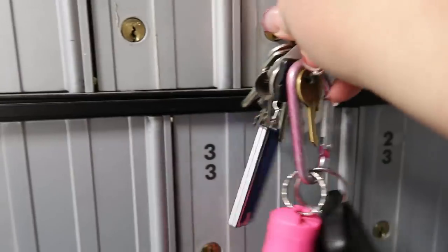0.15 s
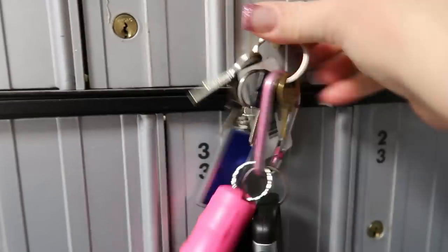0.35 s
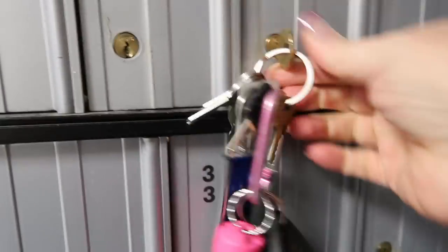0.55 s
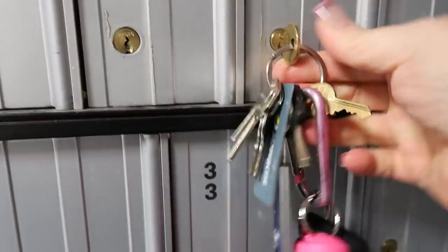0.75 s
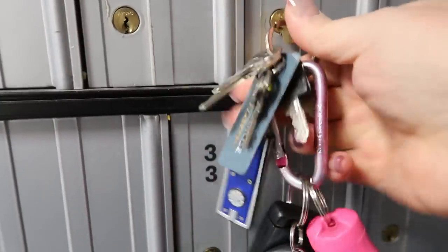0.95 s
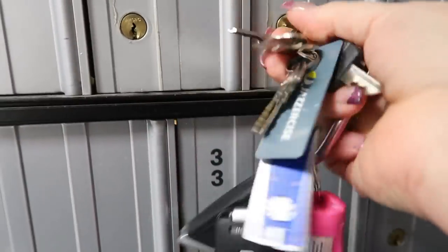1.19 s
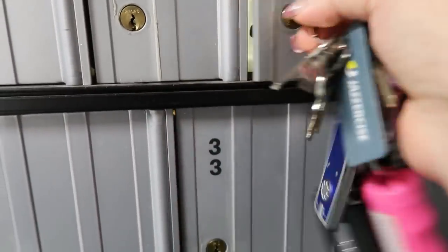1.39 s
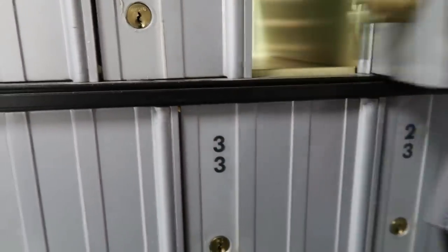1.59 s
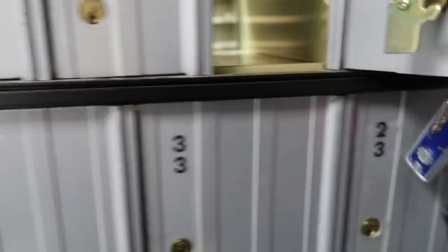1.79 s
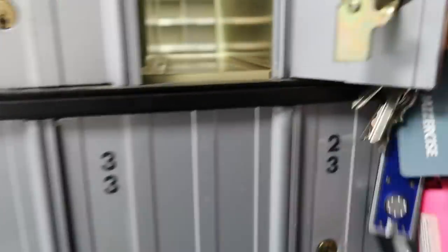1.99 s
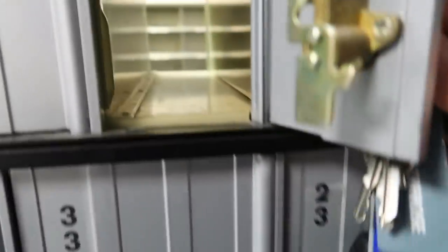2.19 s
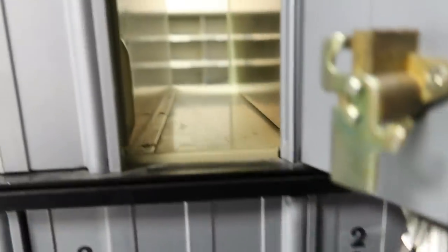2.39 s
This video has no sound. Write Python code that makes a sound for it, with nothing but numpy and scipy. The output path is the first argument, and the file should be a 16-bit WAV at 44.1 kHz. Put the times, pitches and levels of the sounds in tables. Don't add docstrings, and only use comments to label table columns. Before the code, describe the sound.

A bunch of keys jangles as one clacks into a metal box lock and turns; the small sheet-metal door swings open and hits its stop with a sharp clank, very close, in a hard indoor lobby.

```python
import sys
import numpy as np
from scipy import signal
from scipy.fft import rfft, irfft, next_fast_len
from scipy.io import wavfile
from scipy.ndimage import uniform_filter1d, map_coordinates

SR = 44100
rng = np.random.default_rng(int(sys.argv[2]) if len(sys.argv) > 2 else 0)


def attenuation_scalar(level_db):
    decades = np.asarray(level_db, float) / 20
    return 10 ** decades


def log_audio(samples):
    frames = np.atleast_2d(samples).T
    limited = np.clip(frames, -1, 1)
    pcm = np.round(limited * 32767).astype(np.int16)
    wavfile.write(sys.argv[1], SR, pcm)


N = 108045


def unit(x):
    return x / np.sqrt(np.mean(x ** 2) + 1e-20)


def along(points, hz):
    f, v = np.transpose(points)
    return np.interp(np.log(hz + 1), np.log(f + 1), v)


def curves(rows):
    s, *cols = np.transpose(rows)
    return [np.interp(np.arange(N) / SR, s, c) for c in cols]


def filtered(x, response):
    m = next_fast_len(x.shape[-1] + 8192)
    spectrum = rfft(x, m) * response(np.fft.rfftfreq(m, 1 / SR))
    return irfft(spectrum, m)[..., :x.shape[-1]]


def band(x, lo_hz, hi_hz):
    sos = signal.butter(3, [lo_hz, min(hi_hz, SR / 2.2)], "band", fs=SR, output="sos")
    return signal.sosfilt(sos, x)


def add(track, s, sound):
    part = track[round(s * SR):][:len(sound)]
    part += sound[:len(part)]


def ring(hz, db, t60, attack):
    t = np.arange(round(SR * np.max(t60)) + 1)[:, None] / SR
    decay = attenuation_scalar(db - 60 * t / t60)
    modes = decay * np.sin(2 * np.pi * hz * t) * (1 - np.exp(-t / attack))
    return modes.sum(axis=1)


def cluster(count):
    even = np.linspace(-1, 1, count)
    return even + rng.uniform(-1.03, 1, count) / count * (even != 0)


# [f/Hz, correlation]
DIFFUSE_LIKENESS = [(300, 0.99), (1400, 0.95), (3100, 0.78), (7000, 0.21)]


def spread(pair):
    def mid_side_gain(hz):
        turn = np.arccos(np.clip(along(DIFFUSE_LIKENESS, hz), -1, 1)) / 2
        return np.array([np.cos(turn), np.sin(turn)])

    mid, side = filtered(pair, mid_side_gain)
    return np.array([mid + side, mid - side])


# [f/Hz, level/dB]
HUM_COLOUR = [(25, -20), (300, 8.5), (1000, -11.5), (3000, -26), (8000, -26), (13000, -55)]
# [t/s, level/dB]
GRIP_RUMBLE = [(0, -56.5), (.3, -39), (.75, -42.5), (1.2, -56.5), (2.45, -66)]


def air():
    hum = unit(spread(filtered(rng.standard_normal((2, N)), lambda hz: attenuation_scalar(along(HUM_COLOUR, hz)))))
    near_box = np.clip(np.arange(N) / SR * 2 - 3.6, 0, 1)
    hum_db = -46.5 - 14 * near_box
    grip_db, = curves(GRIP_RUMBLE)
    thumps = unit(band(rng.standard_normal(N), 8.8, 200))
    return attenuation_scalar(hum_db) * hum + attenuation_scalar(grip_db) * thumps


def clinks(lo_hz, hi_hz, count):
    hits_per_s, t60, scatter_db, level_db = 45, 0.022, 4, -2.5
    hz = np.exp(rng.uniform(np.log(lo_hz), np.log(hi_hz), count))
    r = attenuation_scalar(-60 / t60 / SR)
    hits = rng.random((count, N)) < hits_per_s / SR
    hits = hits * attenuation_scalar(scatter_db * rng.standard_normal((count, N)))
    total = np.zeros(N)
    for w, h in zip(2 * np.pi * hz / SR, hits):
        total += np.sin(w) * signal.lfilter([1], [1, -2 * r * np.cos(w), r * r], h)
    return attenuation_scalar(level_db) * unit(total)


# [t/s, body level/dB, treble level/dB]
HAND_MOTION = [(0, -48.5, -74), (.174, -59, -87), (.178, -51, -41), (.335, -54.5, -70.5),
               (.345, -37.5, -81), (.46, -26, -34), (.56, -32, -43), (.68, -37.5, -90), (.8, -34.5, -33.5),
               (.91, -54.5, -69), (.96, -34, -46.5), (1.17, -48, -54), (1.32, -36, -55),
               (1.64, -53.5, -67.5), (1.76, -38.5, -42), (1.88, -42.5, -43), (1.95, -50, -75),
               (2.1, -63, -100)]
# [f/Hz, level/dB]
STEEL_COLOUR = [(250, -2.5), (700, 2.5), (2600, -4), (6000, -10.5), (9000, -22.5)]


def rattle():
    grains_per_s, scatter_db, grain_t60 = 1300, 8, 0.0053
    body_db, treble_db = curves(HAND_MOTION)
    hits = rng.random((2, N)) < grains_per_s / SR
    hits = hits * attenuation_scalar(scatter_db * rng.standard_normal((2, N)))
    t = np.arange(SR // 20) / SR
    power_decay = attenuation_scalar(-120 * t / grain_t60)[None]
    power = signal.fftconvolve(hits ** 2, power_decay, axes=1)[:, :N]
    grains = np.sqrt(abs(power)) * rng.standard_normal((2, N))
    body = unit(filtered(grains[0], lambda hz: attenuation_scalar(along(STEEL_COLOUR, hz))))
    fizz = unit(band(grains[1], 3400, 12800))
    body = body + clinks(1850, 4900, count=24)
    fizz = fizz + clinks(7000, 14000, count=14)
    return body * attenuation_scalar(body_db) + fizz * attenuation_scalar(treble_db)


# [t/s, peak level/dB,
# f/Hz, treble level over the clack/dB]
METAL_CLACKS = [(0.0495, -13.5, 4327, -27.5), (0.198, -10.5, 1930, -17.5), (0.3729, -4.5, 1833, -22.5),
                (0.398, -10, 1540, -15), (0.413, -12, 2090, -12), (0.455, -7, 3340, -4),
                (0.4646, -6.5, 2270, -25), (0.51, -12.5, 2860, -13), (0.5251, -13, 3340, -29),
                (0.5793, -11, 2150, -41.5), (0.596, -2, 1745, -24), (0.632, -8.5, 2256, -13.5),
                (0.7132, -20, 2200, -46), (0.786, -28, 2150, -5.5), (0.8057, -8.5, 3724, -10.5),
                (0.835, -21.5, 3760, -8), (0.8582, -11.5, 2120, -42), (0.9539, -13, 1597, -11),
                (0.9956, -15, 5550, -10.5),
                (1.08, -31, 2530, -32), (1.0953, -5, 3585, -29), (1.1374, -19.5, 3170, -5),
                (1.2148, -24.5, 1730, -10), (1.255, -18.5, 3380, -14), (1.2925, -18.5, 2910, -12),
                (1.329, -12.5, 2410, -18), (1.3992, -20, 2580, -29), (1.4288, -7, 3150, -40),
                (1.4441, -5, 2560, -23), (1.5014, -9, 2725, -24), (1.6811, -11.5, 3370, -8),
                (1.772, -7.5, 2260, -14), (1.8, -17, 3590, -18), (1.8136, -16.5, 3730, -7),
                (1.8399, -17, 2930, -0.5), (1.87, -14.5, 2170, -13.5), (1.9649, -9, 3446, -36),
                (1.9926, -12.5, 1860, -1), (2.0059, -9.5, 1723, -20), (2.0122, 3, 3486, -37),
                (2.041, -5.5, 3380, -62), (2.301, -35, 3820, -6), (2.3533, -40, 2040, -51),
                (2.4286, -16.5, 3306, -56)]
# [t/s, peak level/dB, f/Hz]
KEY_TICKS = [(0.0223, -32, 4580), (0.1774, -22.5, 3000), (0.257, -26, 2370), (0.3012, -28.5, 2490),
             (0.3407, -29, 1980), (0.4241, -4.5, 3520), (0.4431, -8, 3730), (0.485, -10, 2600),
             (0.518, -12, 1770), (0.5467, -8, 1800), (0.692, -22, 2310), (0.744, -23, 1780),
             (0.9383, -29, 3570), (0.947, -14, 2550), (1.191, -24, 2270), (1.2306, -12.5, 2330),
             (1.3174, -9.5, 2520), (1.3434, -12, 2600), (1.355, -18.5, 3100), (1.4152, -15.5, 3130),
             (1.492, -14, 2650), (1.5525, -21.5, 2570), (1.5746, -20, 2430), (1.7554, -20, 2220),
             (2.029, -3.5, 6020), (2.0896, -23, 3410)]


def clacks():
    mode_t60, crack_t60, fizz_t60, rise_s = 0.021, 0.0072, 0.028, 0.00039
    crack_wide = 3.2
    ticks = [(s, db - 8, hz, -13.5) for s, db, hz in KEY_TICKS]
    out, t = np.zeros(N), np.arange(SR // 16) / SR
    rise = 1 - np.exp(-t / rise_s)
    for s, db, hz, treble_db in METAL_CLACKS + ticks:
        draw = rng.standard_normal((3, 15))
        noise = rng.standard_normal((2, len(t)))
        away = 0.757 * cluster(count=15)
        level = 3 * draw[1] - 18 * abs(away) - 10 + 4 * (away == 0)
        pitches = hz * np.exp(away) * np.sign(draw[0])
        add(out, s, attenuation_scalar(db) * ring(pitches, level, mode_t60 * np.exp(draw[2] / 5), rise_s))
        crack = unit(band(noise[0], hz / crack_wide, hz * crack_wide / 1.43))
        crack *= attenuation_scalar(-2 - 60 * t / crack_t60)
        fizz = unit(band(noise[1], 3300, 15000))
        fizz *= attenuation_scalar(treble_db - 0.5 - 60 * t / fizz_t60)
        add(out, s, attenuation_scalar(db) * (crack + fizz) * rise)
    return out


# [t/s, level/dB, f/Hz, t60/s]
KEY_CHIMES = [(0.175, -44, 8440, 0.18), (.177, -32, 11700, 0.067), (.413, -17, 5470, 0.043),
              (0.457, -18, 10800, 0.053), (0.493, -20, 12000, 0.044), (.497, -23, 8430, 0.046),
              (.631, -11, 6180, 0.013), (0.642, -35, 12500, 0.14), (0.808, -27, 15770, 0.05),
              (0.939, -36, 8570, 0.18), (0.939, -34, 11500, 0.19), (0.995, -19, 6010, 0.054),
              (1.01, -31, 14900, 0.038), (1.01, -18, 11100, 0.028), (1.245, -34, 11750, 0.066),
              (1.471, -36, 7000, 0.087), (1.502, -21, 5270, 0.027), (1.502, -34, 8840, .05),
              (1.68, -25, 660, 0.12), (1.69, -26, 345, 0.075), (1.839, -23, 13500, 0.14),
              (2.0122, -3.5, 5950, 0.041), (2.03, -24.5, 6491, 0.088), (2.386, -44.5, 2550, 0.037),
              (2.429, -18, 3464, 0.037)]


def chimes():
    out = np.zeros(N)
    for s, db, hz, t60 in KEY_CHIMES:
        pitches = hz * np.array([1, 1.012])
        levels = db + np.array([0, -9])
        add(out, s, ring(pitches, levels, t60, attack=0.00089))
    return out


# [t/s, length/s, level/dB, centre f/Hz]
METAL_SCRAPES = [(0.191, 0.02, -32, 1490), (.342, 0.012, -47, 4500), (0.406, 0.023, -26.5, 4100),
                 (0.439, 0.034, -22.5, 3300), (0.472, 0.055, -31, 3030), (0.948, .03, -51, 2440),
                 (1.291, 0.014, -38, 2800), (1.772, 0.012, -33.5, 2370), (1.797, 0.025, -34.5, 2580),
                 (1.876, 0.015, -38, 2220), (2.386, 0.0095, -49, 1500)]


def scrapes():
    width_octaves, rise_part, grit_db = 1.29, 0.1, 3.3
    out = np.zeros(N)
    for s, length, db, hz in METAL_SCRAPES:
        noise = rng.standard_normal((2, SR // 8))
        u = np.arange(SR // 8) / SR / length
        grit = noise[0] * attenuation_scalar(grit_db * unit(uniform_filter1d(noise[1], size=40)))
        colour = lambda f: np.exp(-(np.log2(f / hz + 1e-9) / width_octaves) ** 2 / 2)
        swell = np.clip(np.minimum(u / rise_part, 3 - 2 * u), 0, 1)
        add(out, s, attenuation_scalar(db) * unit(filtered(grit, colour)) * swell)
    return out


# [t/s, peak level/dB, f/Hz]
PANEL_KNOCKS = [(0.197, -18, 732), (0.207, -17, 647), (.373, -13.5, 776), (.395, -10.5, 303),
                (.524, -9, 874), (0.582, -12.5, 744), (.594, -8, 691), (0.713, -14, 410),
                (.751, -12.5, 733), (.805, -11.5, 668), (.859, -13, 390), (.872, -17.5, 692),
                (0.996, -15.5, 715), (1.095, -7, 771), (1.231, -20.5, 700), (1.428, -17.5, 736),
                (1.444, -14.5, 740), (1.482, -21.5, 700), (1.5, -17.5, 440), (1.679, -15.5, 750),
                (1.965, -17.5, 920), (1.969, -20, 529), (2.013, -9.5, 1206), (2.012, -11, 474),
                (2.041, -6, 930), (2.042, -11.5, 491), (1.096, -24, 447), (1.095, -18.5, 1560),
                (2.43, -29, 644)]
# [t/s, peak level/dB, favoured f/Hz]
PANEL_BOOMS = [(0.198, -27.5, 232), (0.332, -28.5, 257), (.395, -21, 270), (0.598, -23, 243),
               (0.715, -23.5, 185), (.859, -24.5, 263), (.872, -22.5, 197), (1.095, -34, 190),
               (1.532, -33.5, 209), (2.011, -29, 287), (2.039, -27, 190)]
# [f/Hz, t60/s]
PANEL_MODES = [(180, .16), (215, .09), (267, .1), (325, .06)]


def door():
    knock_t60, favour_db = 0.024, 11
    out = np.zeros(N)
    low_hz, low_t60 = np.transpose(PANEL_MODES)
    for s, db, hz in PANEL_KNOCKS:
        draw = rng.standard_normal((3, 9))
        away = 0.664 * cluster(count=9)
        lead = away == 0
        level = db - 7 + 2 * draw[1] - 10 * abs(away) + 5 * lead
        pitches = hz * np.exp(away) * np.sign(draw[2])
        add(out, s, ring(pitches, level, knock_t60 * (1 + 0.14 * lead), attack=0.00019))
    for s, db, hz in PANEL_BOOMS:
        draw = rng.standard_normal((2, 4))
        level = db + 6.5 + 2 * draw[1] - favour_db * abs(np.log2(low_hz / hz))
        add(out, s, ring(low_hz * np.exp(0.033 * draw[0]), level, low_t60, attack=0.0076))
    return out


# [f/Hz, t60/s]
LOBBY_DECAY = [(300, 0.66), (2000, 0.36), (10000, 0.19)]


def lobby(x):
    hz, t, noises = signal.stft(rng.standard_normal((2, 2, SR)), SR, nperseg=256)
    wall_t60 = 0.089
    t60s, levels_db = [wall_t60, along(LOBBY_DECAY, hz)[:, None]], [-8.5, -14.5]
    tail = 0
    for noise, t60, db in zip(noises, t60s, levels_db):
        echo = signal.istft(noise * attenuation_scalar(-60 * t / t60), SR, nperseg=256)[1]
        tail = tail + attenuation_scalar(db) * echo / np.linalg.norm(echo[0])
    late = np.pad(x, (100, 0))[None]
    return spread(signal.fftconvolve(late, tail, axes=1)[:, :N])


# [t/s, left lag/s, L-R level/dB]
DOOR_DRIFT = [
    (0, 0.000019, 1),
    (1.5, 0.000024, 0.45),
    (2.45, 0.000054, -1),
]
# [f/Hz, L-R level/dB]
HAND_SHADOW = [(300, -1.8), (4400, -2), (12000, -0.8)]


def shade(x):
    open_s, shade_hz = 1.785, 12200
    shaded = filtered(x, lambda hz: 1 / (1 + (hz / shade_hz) ** 20))
    return np.where(np.arange(N) < open_s * SR, x, shaded)


def scene():
    dull = clacks() + door() + rattle() + scrapes()
    keys = chimes()
    lag_s, pan_db = curves(DOOR_DRIFT)
    metal = shade(dull + keys)
    near = [map_coordinates(metal, [np.arange(N) - k * lag_s * SR], order=5) for k in (.5, -.5)]
    near = filtered(np.array(near), lambda hz: attenuation_scalar(np.outer([.5, -.5], along(HAND_SHADOW, hz))))
    echoes = lobby(shade(dull + 0.76 * keys))
    return (near + echoes) * attenuation_scalar([pan_db / 2, -pan_db / 2]) + air()


def roll_off(x):
    return signal.sosfilt(signal.butter(12, 15920, fs=SR, output="sos"), x)


def record(dry):
    ceiling, top_hz = 0.93, 15900
    gate_hz, gate_db, gate_s = 13300, -61, 0.02
    limited = dry / (1 + abs(dry / ceiling) ** 8) ** (1 / 8)
    x = filtered(limited, lambda hz: hz < top_hz)
    treble = filtered(x, lambda hz: hz > gate_hz)
    power = uniform_filter1d((treble ** 2).mean(axis=0), round(gate_s * SR))
    shut = uniform_filter1d(1. * (power < attenuation_scalar(2 * gate_db)), size=128)
    return roll_off(x - treble * shut)


dry = scene()
out = record(dry)
log_audio(out)
```